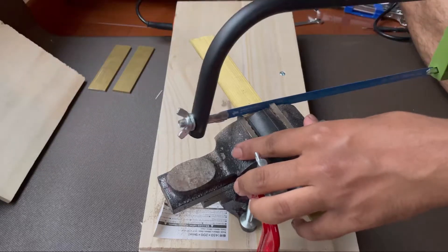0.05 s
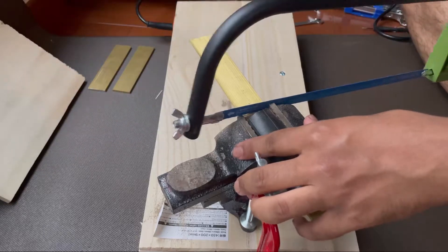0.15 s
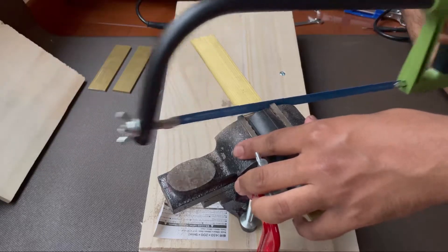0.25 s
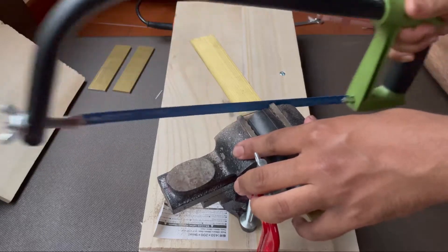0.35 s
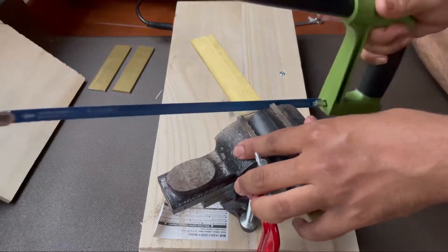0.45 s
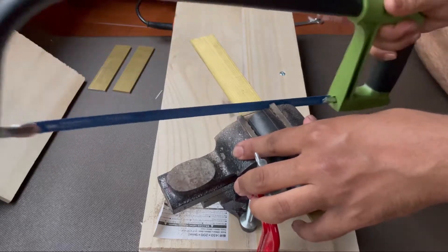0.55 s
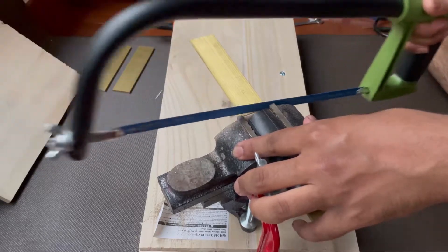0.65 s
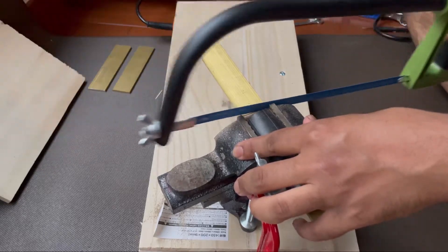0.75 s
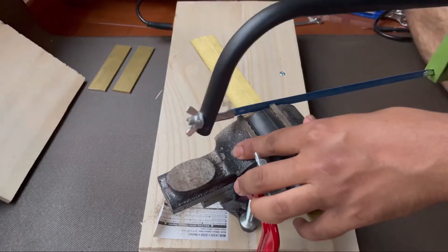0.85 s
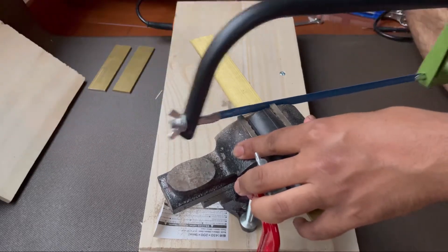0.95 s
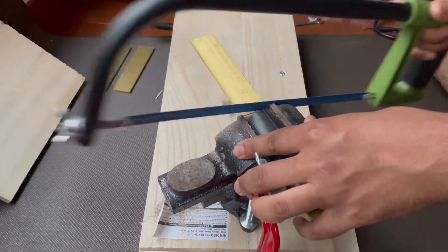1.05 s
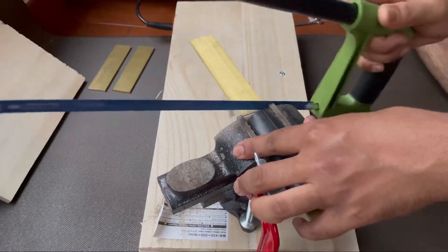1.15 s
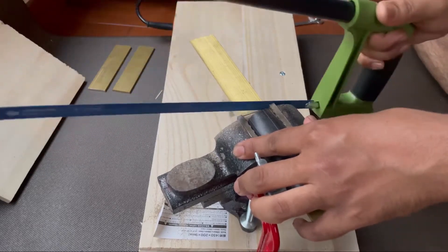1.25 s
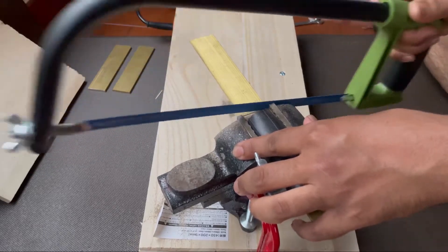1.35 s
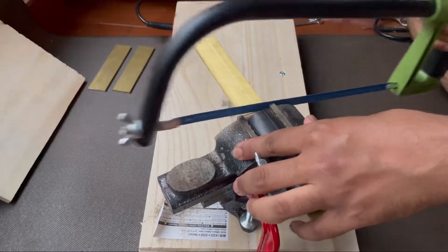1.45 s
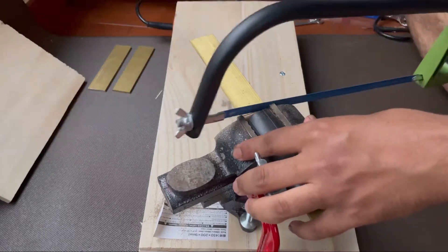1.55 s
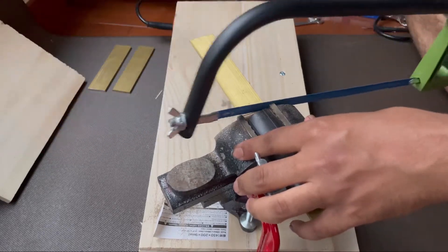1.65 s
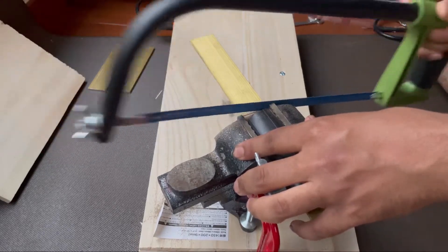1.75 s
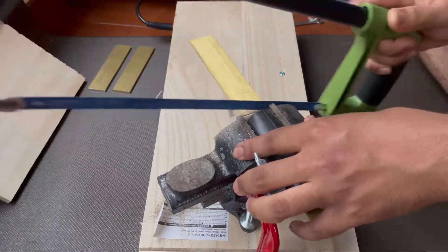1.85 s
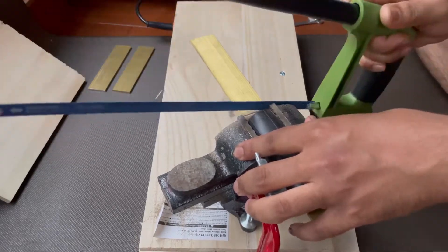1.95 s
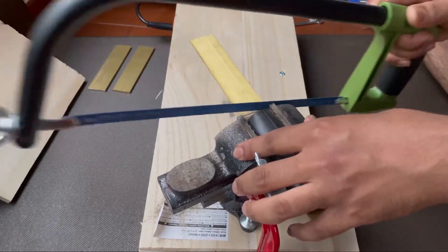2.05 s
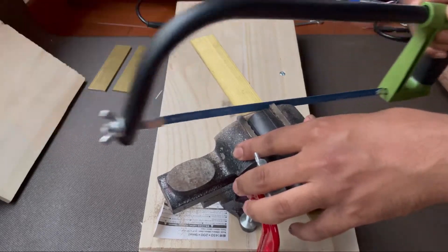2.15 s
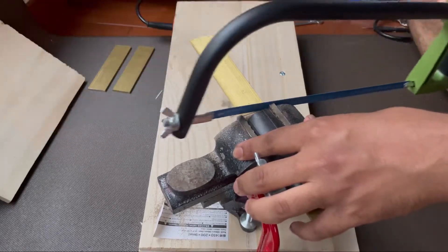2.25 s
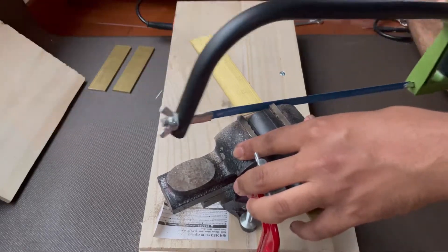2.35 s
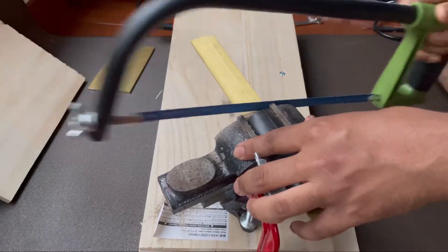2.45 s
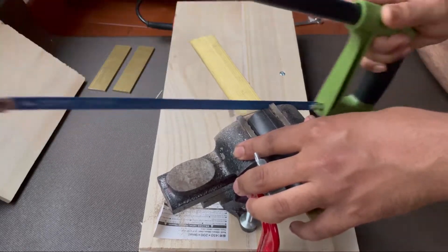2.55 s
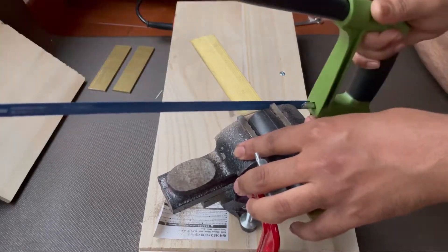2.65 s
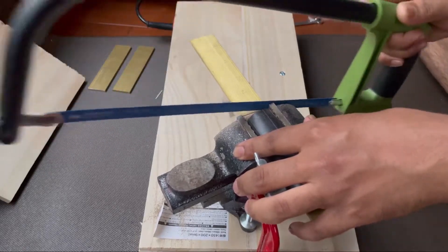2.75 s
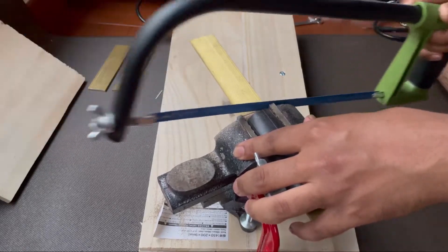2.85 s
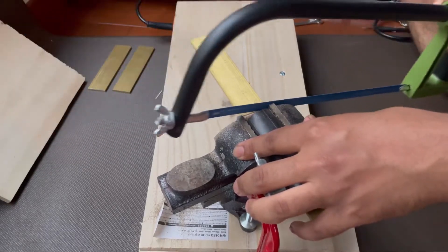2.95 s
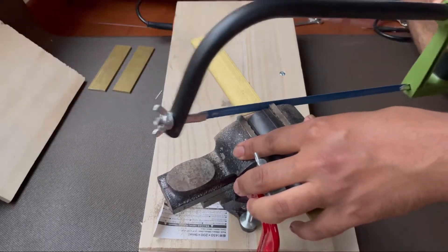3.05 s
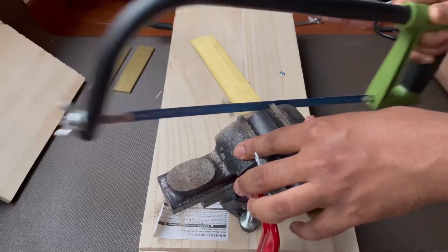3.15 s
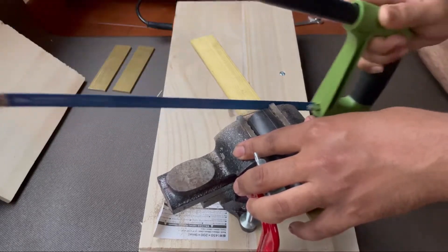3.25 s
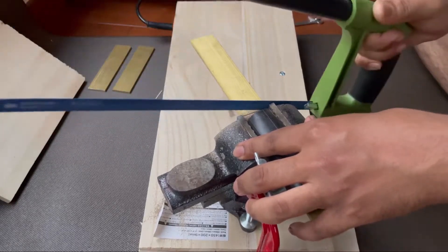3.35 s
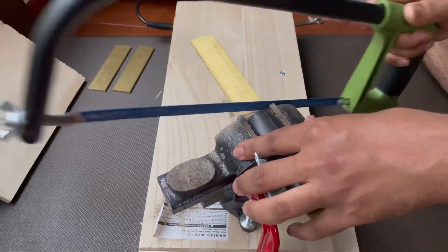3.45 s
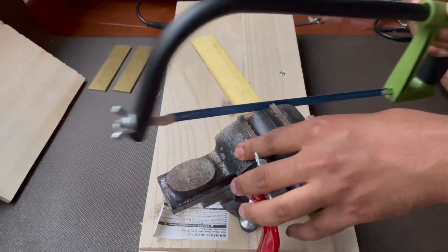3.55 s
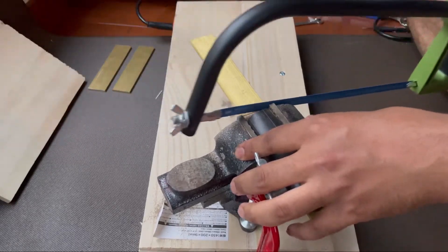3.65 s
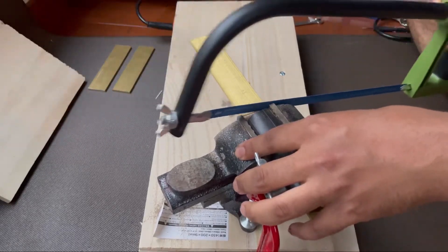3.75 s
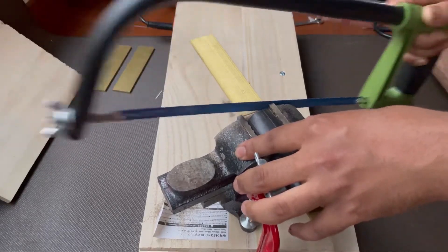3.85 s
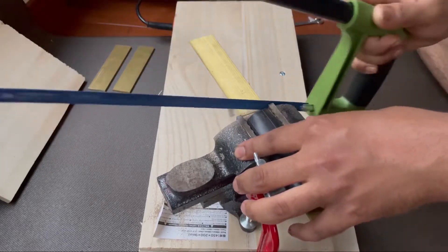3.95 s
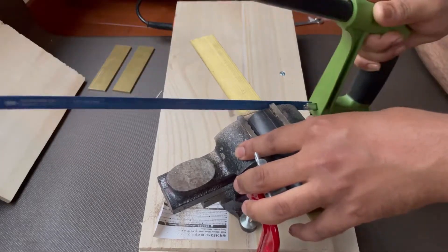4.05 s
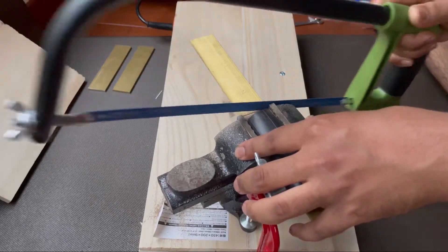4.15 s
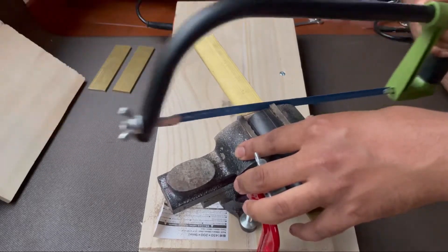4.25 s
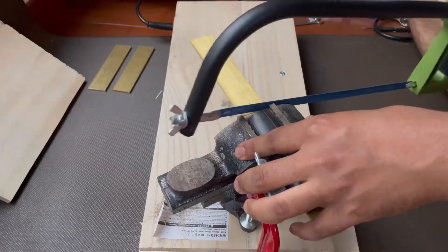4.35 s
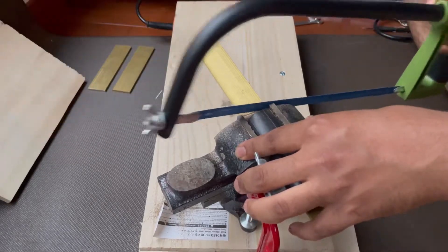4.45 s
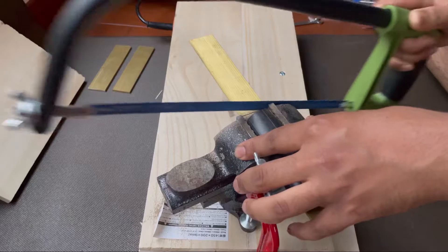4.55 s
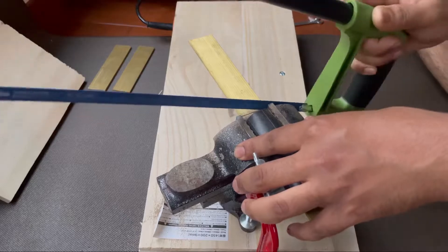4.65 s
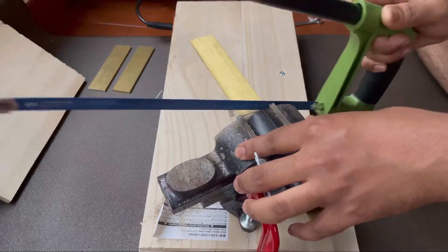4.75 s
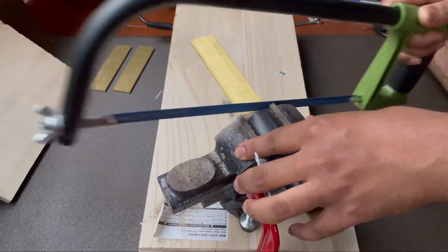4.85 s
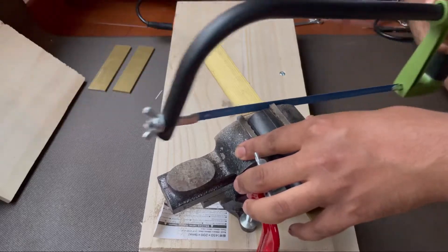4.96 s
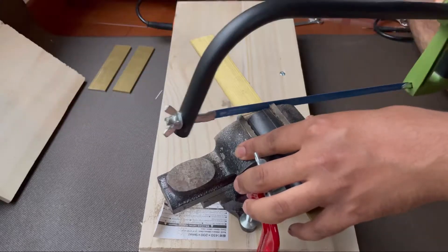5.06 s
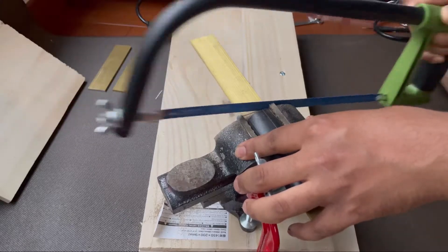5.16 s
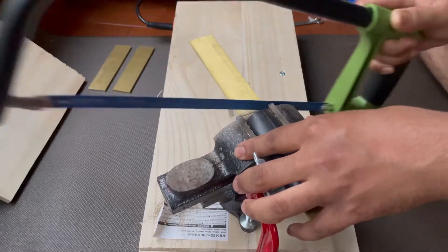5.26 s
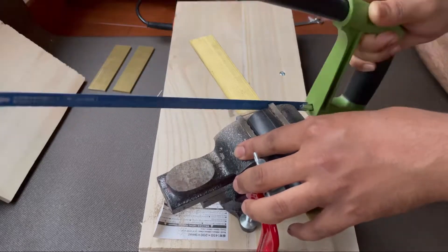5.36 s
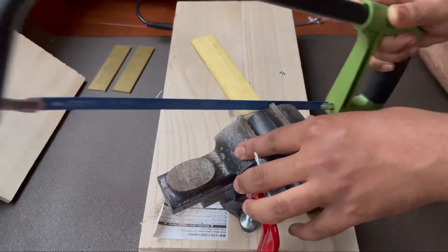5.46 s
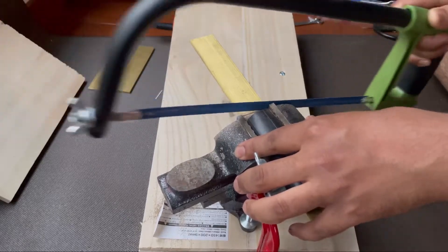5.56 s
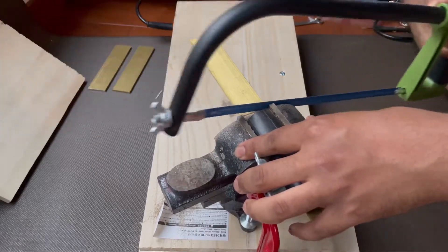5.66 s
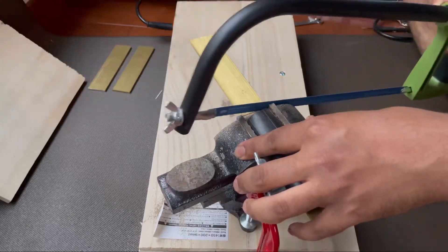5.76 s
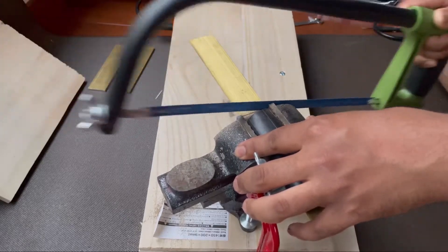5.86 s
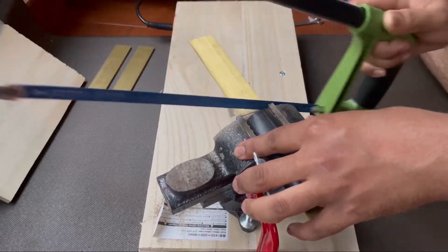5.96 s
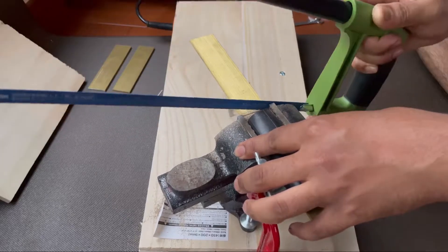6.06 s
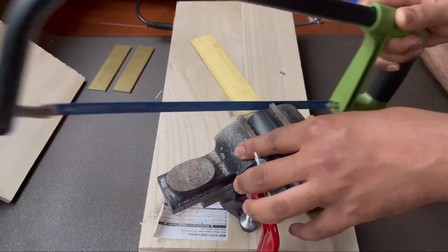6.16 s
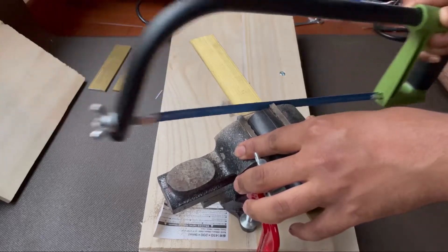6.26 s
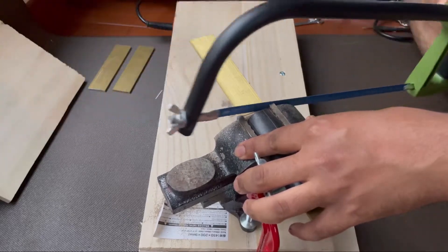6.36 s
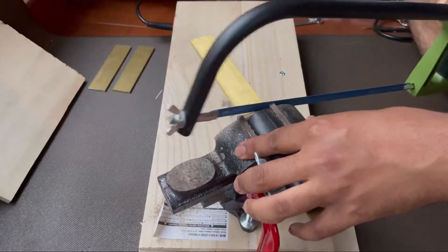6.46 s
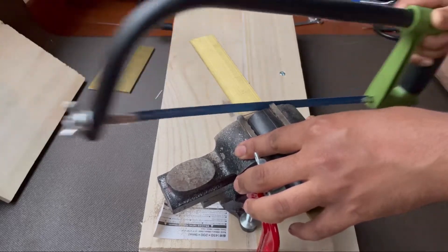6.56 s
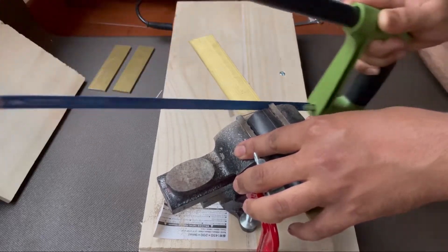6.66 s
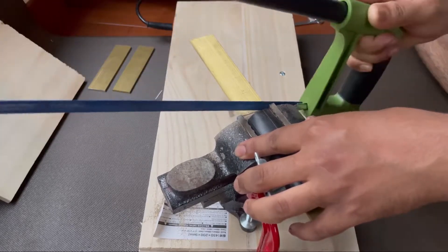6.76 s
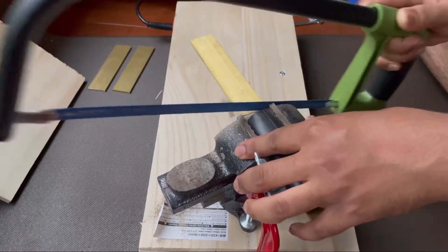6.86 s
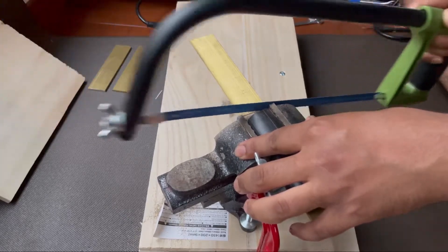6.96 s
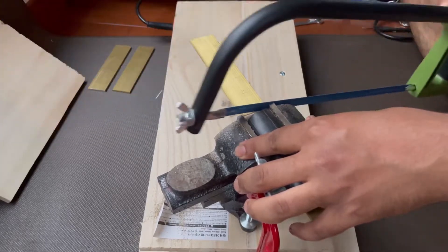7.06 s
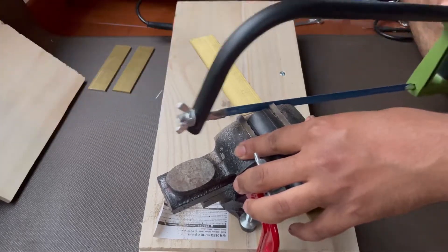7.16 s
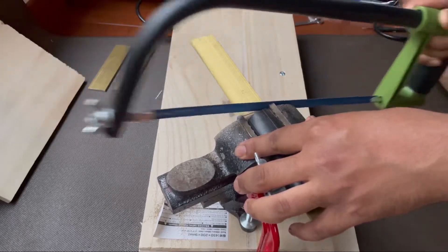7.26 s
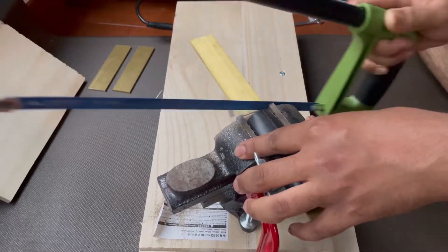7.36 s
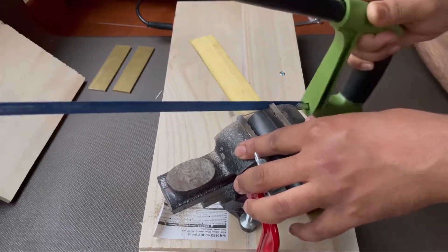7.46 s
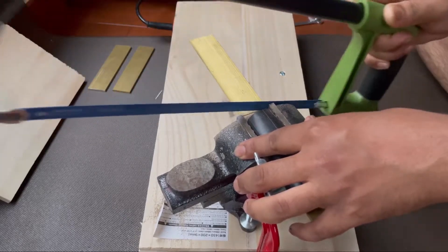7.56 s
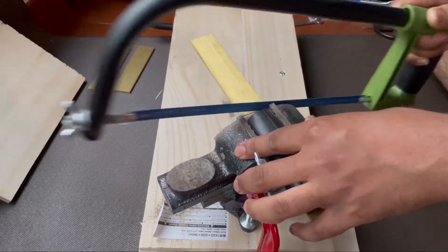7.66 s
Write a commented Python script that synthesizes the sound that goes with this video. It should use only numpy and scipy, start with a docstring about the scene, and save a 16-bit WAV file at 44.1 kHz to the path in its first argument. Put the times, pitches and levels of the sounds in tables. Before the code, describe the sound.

Close stereo pickup in a small room: a hand hacksaw cuts a brass strip held in a vise. About three strokes a second, push and pull alternating, each a gritty rasp whose buzzing pitch rises and falls with speed. Pushes are generally brighter and hissier, pulls rougher with blade chatter. Teeth sometimes catch, a dull knock comes early, and the bench rumbles softly underneath.

```python
"""A hand hacksaw cuts a brass strip held in a vise on a wooden bench, close by in a small room.
Its teeth strike at a rate that rises and falls with each stroke: clicks excite noise bursts (scrape and
chip hiss), a harmonic tooth note, and the modes of blade and vise. Push and pull differ in colour; now and
then the teeth catch. Low bench modes tremble and rock under it, one dull jolt knocks the vise, and
the room adds reflections, a diffuse tail and a soft noise floor."""
import sys
import numpy as np
from scipy import signal
from scipy.fft import rfft, irfft
from scipy.io import wavfile
from scipy.ndimage import uniform_filter1d

SR = 44100
rng = np.random.default_rng(int(sys.argv[2]) if len(sys.argv) > 2 else 0)


def waveform_to_disk(signal):
    """Save audio, clipped to [-1, 1], as 16-bit WAV at the path in sys.argv[1]."""
    frames = np.transpose(np.atleast_2d(signal))
    scaled = np.clip(frames, -1, 1) * 32767
    samples = np.round(scaled).astype(np.int16)
    wavfile.write(sys.argv[1], SR, samples)


N = 340011
TIME = np.arange(N) / SR
LAST_STROKE_END_S = 7.8
RESTING_DB = -55  # force of the blade lying in the cut
CUTOFF_HZ = 15900
ROCK_RISE_DB_PER_S, ROCK_FALL_DB_PER_S = 176.5, 94.5

# All levels are relative: later stages set the balance.
# room tone spectrum: f/Hz, level/dB per Hz
ROOM_TONE_SPECTRUM = [(25, -46), (60, -7), (150, -9), (300, -11.5), (1000, -19.5), (4000, -28),
                      (16000, -41.5)]
# reverberation time of the room: f/Hz, t60/s
ROOM_DECAY = [(200, 1), (1000, 0.528), (4000, 0.482), (15000, 0.3546)]
# modes of the bench: f/Hz, level/dB, t60/s
BENCH_MODES = [(48.2, -10.5, 0.23), (85.11, -1.5, 0.26), (95.7, -5.5, 0.2055), (136.4, -19, 0.092)]
# the bench rocks as the saw is pulled out to its tip and turned round: t/s, level/dB
BENCH_ROCKS = [(0.209, -38), (0.799, -30), (1.55, -34), (2.18, -37.5), (2.95, -41.5), (3.65, -33.5),
               (4.32, -38), (4.97, -37), (5.68, -39.5), (6.35, -35), (7.05, -32.5)]
# trembling of the bench under the drag: place (0 tip, 1 handle), push level/dB, pull level/dB
TREMBLE_BY_PLACE = [(0, -46.5, -45), (.2, -45.5, -50.5), (.5, -52, -46), (.85, -49, -42.5),
                    (1, -48.5, -47.5)]
# the saw sticks once and jolts the vise: t/s, level/dB, t60/s
VISE_JOLT = (.79, -36, 0.247)
# its dull knock: f/Hz, level/dB per Hz
KNOCK_SPECTRUM = [(60, -11.5), (120, -1), (280, -4.5), (600, -1.5), (1200, -0.5), (2500, -21), (8000, -46)]
# modes of the vise on its board: f/Hz, level/dB, t60/s
VISE_MODES = [(439.1, 0, 0.172), (464.3, -1.5, 0.093), (509.1, -5.5, 0.15), (637.8, -5.5, 0.087)]
# bending modes of the blade: f/Hz, level/dB, t60/s
BLADE_MODES = [(1029.2, -6, 0.0205), (1170.4, 0, 0.0392), (1269.7, 3, 0.03), (1386.4, 0.5, 0.0326),
               (1513, -5, 0.0072), (2285.6, -6, 0.12)]
# blade chatter: place (0 tip, 1 handle), push level/dB, pull level/dB
CHATTER_BY_PLACE = [(0, -10.5, -7.5), (.2, -18, -11), (.5, -4.5, 0), (.76, -2.5, 6.5), (.9, -8, -2),
                    (1, -16, 0.5)]
# peaks and hollows in the colour heard, with deep hollows near 5.6 and 9.3 kHz: f/Hz, width at half the # dB
# gain/Hz, gain/dB
COLOUR_BELLS = [(450, 36.7, 5), (486.6, 33, 1.5), (566, 55.5, -5), (643, 21.9, 9), (879.7, 39.7, 4.5),
                (1039, 37, 0.5), (1075.8, 90, -8.5), (1182, 33, -5), (1290, 22.6, 4), (1481, 30, 3),
                (1654, 81, -0.5), (1789, 56.5, 4), (2151.8, 50.8, 5), (2440, 130, 5), (2669.5, 76, 3.5),
                (3357, 164, 5.5), (3801, 200, 3.5), (4000, 58, -0.5), (5608, 285, -10), (6160, 224, 3),
                (6780, 450, 3), (7400, 280, 1.5), (9322, 672, -13), (10034, 560, 7)]
# radiation of the small frame, weak in the bass: f/Hz, level/dB
FRAME_RADIATION = [(150, -49.5), (370, -16.5), (450, -3.5), (700, -7.5), (1000, 0), (1400, 3), (2300, 3),
                   (4000, 1.5), (16000, -0.5)]
# broad colour of the scraping: f/Hz, level/dB per Hz
SCRAPE_SPECTRUM = [(100, -25), (250, -8.5), (380, -14), (450, -6.5), (700, -9), (1000, -8), (1400, -5.5),
                   (2300, 1), (3000, -4), (4000, 3.5), (5000, -0.5), (7000, -0.5), (8300, -9.5),
                   (16000, -23)]
# colour of the hissing chips: f/Hz, level/dB per Hz
CHIP_SPECTRUM = [(3000, -42), (7000, -18.5), (9000, 1.5), (11000, 4), (12500, 5), (14000, -0.5),
                 (16000, -9)]
# overtones of the tooth note, from the second partial up: level/dB
OVERTONE_LEVELS = [-6, -4.5, -10.5, -9.5, -6.5]
# teeth catching on the edge of the cut: t/s, level/dB, t60/s
TOOTH_CATCHES = [(.188, -31.5, 0.04), (.504, -31.5, 0.25), (.69, -21, 0.3056), (3.733, -26.5, 0.5335),
                 (4.415, -19, 0.2919), (5.778, -19.5, 0.2885), (6.472, -22.5, 0.4456), (7.668, -22, 0.26)]
# how fast the hand bears down, and lets go: push slope/(dB/s), pull slope/(dB/s)
PRESS_SLOPES = (281, 180)
RELEASE_SLOPES = (160, 169)
# exponent of the speed arch (1 a plain swing, less a flatter top):
# push speeding up, push slowing, pull speeding up, pull slowing
ARCH_EXPONENTS = (.81, .52, .74, .85)
# strokes, push and pull in turn: start t/s, time to top speed/s, top rate/(teeth/s),
# time to full pressure/s, hold/s, force level/dB, swell during the hold/dB, then offsets:
# chip hiss level/dB, tooth note level/dB, its overtones level/dB, extra blade chatter level/dB
SAW_STROKES = [(0.061, 0.164, 694.0, 0.1386, 0.1267, -30.5, 3.5, -2.5, -7, -10, 1),
               (0.446, 0.1915, 677.0, 0.088, 0.251, -34.5, 0, -3, -17.5, -10.5, 3.5),
               (0.838, 0.2357, 1071.0, 0.0886, 0.1175, -34, 5.5, -1, -4, -15, 3),
               (1.212, 0.1094, 752.0, 0.0674, 0.1416, -30.5, 6.0, -4.5, -13.0, -12, 1),
               (1.595, 0.1192, 922.0, 0.0642, 0.0854, -23.5, -2.5, -2.0, -9.5, -11, -2.0),
               (1.859, 0.2466, 678.0, 0.1215, 0.171, -33.0, 1, -5.0, -18.5, -9.0, 0.5),
               (2.271, 0.195, 984, 0.0893, 0.0783, -26.0, -0.0, -2.0, -3.5, -14.5, 1.5),
               (2.615, 0.142, 722.0, 0.0876, 0.151, -31.0, 1.0, -5, -16.5, -9.5, 0.5),
               (2.969, 0.191, 993.0, 0.09255, 0.0864, -22.5, -6.5, -1.5, -4.5, -12, 2.0),
               (3.354, 0.0725, 749.0, 0.004, 0.1707, -34.5, 8.5, -5.0, -12, -14, 1.5),
               (3.668, 0.1804, 1062.0, 0.0763, 0.1099, -24.0, -8.5, -0.5, 1, -15, 2),
               (3.955, 0.1393, 778, 0.1219, 0.1292, -30.0, 7.5, -5, -13.5, -10.5, 1),
               (4.36, 0.1518, 1019.0, 0.0583, 0.0935, -26, -2, -0.5, -2.5, -12.5, 0.5),
               (4.652, 0.1707, 714.0, 0.0992, 0.1591, -29, 0.5, -6.5, -11.5, -12, 0),
               (5.008, 0.1824, 888.0, 0.1088, 0.0622, -21.5, -6, -1.5, -0.5, -9, 2.5),
               (5.384, 0.12, 709.0, 0.0365, 0.1684, -31.5, 5, -5, -12.5, -9.5, 1.5),
               (5.703, 0.1868, 983.0, 0.0819, 0.119, -24.5, -10.5, -1, -1.5, -11.5, 1.5),
               (6.041, 0.1438, 769.0, 0.0949, 0.1297, -27.0, 3.0, -5.5, -16, -8, -2.5),
               (6.389, 0.1698, 1017.0, 0.0741, 0.1194, -25.0, -9.0, -3, -7, -6.5, 5),
               (6.731, 0.1372, 820.0, 0.1372, 0.1019, -22.5, -3.5, -5, -11, -10.5, -4),
               (7.094, 0.179, 1020.0, 0.1099, 0.0553, -20, -9.0, -2.5, -17, -8, -1.5),
               (7.441, 0.1487, 775.0, 0.09, 0.1333, -32.5, 9.0, -3.5, -13.5, -6.5, 0)]


def from_db(db):
    """Logarithmic level: decibels to amplitude gain."""
    return 10 ** (np.asarray(db) / 20)


def rms_one(x):
    """Normalisation of power: scale to rms 1."""
    return x / np.sqrt(np.mean(x ** 2) + 1e-20)


def at_hz(points, hz):
    """Interpolation of a table on a log-frequency axis."""
    known, values = np.transpose(points)
    return np.interp(np.log(np.maximum(hz, 1)), np.log(known), values)


def drift(per_s):
    """Slow random process: joined random knots, per_s of them a second, with rms 1."""
    knots = rng.standard_normal(8192)
    return rms_one(np.interp(TIME * per_s, np.arange(len(knots)), knots))


def colour(x, spectrum, bells=(), size=8192):
    """Minimum-phase filtering: a broad spectrum with bell-shaped peaks and hollows, made causal."""
    hz = np.fft.rfftfreq(size, 1 / SR)
    db = at_hz(spectrum, hz)
    for centre, width, gain in bells:
        db = db + gain * 2 ** -(2 * (hz - centre) / width) ** 2
    # folding the cepstrum onto positive times gives minimum phase
    cepstrum = irfft(np.log(from_db(db)))
    cepstrum[1:size // 2] *= 2
    cepstrum[size // 2 + 1:] = 0
    response = irfft(np.exp(rfft(cepstrum)))
    return signal.oaconvolve(x, response / np.linalg.norm(response))[:N]


def ring(force, modes):
    """Modal superposition: a force drives damped resonators in parallel, summed to rms 1."""
    out = 0
    for k, (hz, db, t60) in enumerate(modes):
        radius = from_db(-60 / (t60 * SR))
        angle = 2 * np.pi * hz / SR
        poles = [1, -2 * radius * np.cos(angle), radius * radius]
        mode = rms_one(signal.lfilter([1, 0, -1], poles, force))
        out = out + (-1) ** k * from_db(db) * mode  # neighbours in opposite sign
    return rms_one(out)


def swell(s, db, rise_db_per_s, fall_db_per_s, hold_s=0, swell_db=0):
    """Exponential envelope: attack up to time s, a hold that may swell or sag, release."""
    age = TIME - s
    held = np.clip(age / max(hold_s, 1e-3), 0, 1)
    rise_db = rise_db_per_s * np.maximum(-age, 0)
    fall_db = fall_db_per_s * np.maximum(age - hold_s, 0)
    return from_db(db + swell_db * held - rise_db - fall_db)


def motion():
    """Kinematics of the swing: teeth per second, stroke number, place in the cut (0 tip, 1 handle)."""
    start, speed_up_s, top = np.transpose(SAW_STROKES)[:3]
    marks = np.append(np.column_stack([start, start + speed_up_s]).ravel(), LAST_STROKE_END_S)
    half_strokes = np.interp(TIME, marks, np.arange(len(marks)))
    stroke = np.minimum(half_strokes // 2, len(top) - 1).astype(int)
    swing = half_strokes * np.pi / 2
    exponent = np.array(ARCH_EXPONENTS)[half_strokes.astype(int) % len(ARCH_EXPONENTS)]
    rate = top[stroke] * np.abs(np.sin(swing)) ** exponent  # stops at each turn
    return rate, stroke, (1 - np.cos(swing)) / 2


def along_blade(table, stroke, place):
    """Position-dependent excitation: level in dB by place in the cut and direction (odd strokes pull)."""
    places, push, pull = np.transpose(table)
    return np.where(stroke % 2, np.interp(place, places, pull), np.interp(place, places, push))


def room_tone(level_db=-58):
    """Diffuse noise floor: independent coloured noise in each channel."""
    tone = np.array([colour(rng.standard_normal(N), ROOM_TONE_SPECTRUM) for _ in range(2)])
    return from_db(level_db) * tone


def rocking():
    """Addition of powers: a tremble under every stroke joins a rock at each listed turn."""
    _, stroke, place = motion()
    power = from_db(along_blade(TREMBLE_BY_PLACE, stroke, place)) ** 2
    for s, db in BENCH_ROCKS:
        power = power + swell(s, db, ROCK_RISE_DB_PER_S, ROCK_FALL_DB_PER_S) ** 2
    return np.sqrt(uniform_filter1d(power, size=800))


def bench():
    """Forced vibration: the uneven pull on the vise, as low noise, shakes the modes of the bench."""
    band = signal.butter(2, [42, 220], "band", fs=SR, output="sos")
    sway = ring(signal.sosfilt(band, rng.standard_normal(N)), BENCH_MODES)
    # level out the chance swells, so that the rocking sets the strength
    steady = sway / np.sqrt(uniform_filter1d(sway ** 2, size=4000) + 0.068)
    return rocking() * steady


def jolt():
    """Impact: a rough, dull knock of the vise on its board, as decaying coloured noise."""
    s, db, t60 = VISE_JOLT
    knock = rms_one(colour(rng.standard_normal(N), KNOCK_SPECTRUM))
    return swell(s, db, rise_db_per_s=2000, fall_db_per_s=60 / t60) * knock


def vise_moan(passed, force, stroke, place, moan_db=-54, push_db=-6, tip_length=0.173, spread_rad=-1.375):
    """Swept resonance: near the tip the tooth rate slides through the vise modes, most on the pull."""
    shake = np.sqrt(force) * np.exp(-place / tip_length) * from_db(np.where(stroke % 2, 0, push_db))
    phase = np.array([[0], [spread_rad]])  # left, right
    return from_db(moan_db) * ring(shake * np.sin(2 * np.pi * passed + phase), VISE_MODES)


def vise_groan(crackle, force, rate, level_db=-21.5, fast_db=-9):
    """Inertia: the heavy vise answers best to slow teeth, so it groans near the turns."""
    drag = crackle * np.sqrt(force) * from_db(fast_db * rate / rate.max())
    return from_db(level_db) * np.sqrt(np.mean(force ** 2)) * ring(drag, VISE_MODES)


def blade_chatter(crackle, hand, stroke, place, level_db=-3.5):
    """Bending vibration: the crackle drives the blade modes, strongest three quarters of the way up."""
    blade_db = along_blade(CHATTER_BY_PLACE, stroke, place) + np.array(SAW_STROKES)[stroke, -1]
    return hand * from_db(level_db + blade_db) * ring(crackle.mean(axis=0), BLADE_MODES)


def tooth_note(passed, stroke, place, spread_rad=0.933):
    """Periodic excitation: evenly spaced teeth sing partials of their rate, which arch with the speed."""
    worn_db, entry_db, pull_db, overtone_level_db = -14, -10, 5, .5
    flutter_db, patchy_db = 4.5, 2.5
    note_db, overtones_db = np.array(SAW_STROKES)[stroke, 8:10].T
    to_tip, to_handle = np.maximum(1 - 2 * place, 0), np.maximum(2 * place - 1, 0)
    # entering the push the teeth only nick the edge, thin and bright; on the pull they ride over it and groan
    note_db = note_db + np.where(stroke % 2, pull_db, entry_db) * to_tip
    partials = [(1, note_db)]  # fundamental, at the tooth rate
    partials += [(k + 2, overtones_db + overtone_level_db + db) for k, db in enumerate(OVERTONE_LEVELS)]
    phase = np.array([[0], [spread_rad]])  # the flat blade reaches the two microphones out of step
    note = 0
    for k, db in partials:
        waver_db = flutter_db * drift(per_s=110) + patchy_db * drift(per_s=35)
        note = note + from_db(db) * rms_one(np.sin(2 * np.pi * k * passed + phase) * from_db(waver_db))
    note = note * from_db(worn_db * np.sqrt(to_handle))  # the half near the handle is worn
    return np.array([colour(x, FRAME_RADIATION, COLOUR_BELLS) for x in note])


def teeth(passed, rate, uneven_db):
    """Impulse train: one click of uneven height for each passing tooth, weaker when they crowd."""
    strikes = np.diff(np.floor(passed), prepend=0)
    return strikes * from_db(uneven_db * rng.standard_normal(N)) / np.sqrt(rate + 150)


def tearing(clicks, length_s, clump_db, spread_db, grab_db=0.7122):
    """Fracture noise: behind each tooth a chip tears off in a short crackle, partly unlike left and right."""
    burst = signal.lfilter([1], [1, -np.exp(-1 / (length_s * SR))], clicks)
    noise = rng.standard_normal(N) + from_db(spread_db) * rng.standard_normal((2, N))
    grip_db = clump_db * drift(per_s=260) + grab_db * drift(per_s=55)  # single teeth, and runs that grab
    return rms_one(burst * noise * from_db(grip_db))


def share_load(x, rate, span_teeth=0.776):
    """Load sharing among teeth: less a moving mean, changes slower than the tooth rate even out."""
    half = span_teeth * SR / np.maximum(rate, 300) / 2
    n = np.arange(N)
    means = []
    for total in np.cumsum(x, axis=1):
        upper = np.interp(n + .5 + half, n + 1, total)
        lower = np.interp(n + .5 - half, n + 1, total)
        means.append((upper - lower) / (2 * half))
    return x - means


def scraping(crackle, rate, level_db=-0.5):
    """Filtered friction noise: the shared load of the teeth takes on the colour of the sawing."""
    load = share_load(crackle, rate)
    return from_db(level_db) * rms_one(np.array([colour(x, SCRAPE_SPECTRUM, COLOUR_BELLS) for x in load]))


def chip_hiss(crackle, stroke, place, level_db=-1.5, tip_dull_db=-6, tip_length=0.0708):
    """High-frequency fracture noise: each stroke has its own hiss, and the very tip cuts dully."""
    bite_db = np.array(SAW_STROKES)[stroke, 7] + tip_dull_db * np.exp(-place / tip_length)
    hiss = rms_one(np.array([colour(x, CHIP_SPECTRUM, COLOUR_BELLS) for x in crackle]))
    return from_db(level_db + bite_db) * hiss


def catches():
    """Transient force of the snags: a jump that dies away exponentially."""
    force = np.zeros(N)
    for s, db, t60 in TOOTH_CATCHES:
        age = np.maximum(TIME - s, 0)
        force += from_db(db - 60 * age / t60) * np.minimum(age / 0.00068, 1)
    return force


def pressure():
    """Contact force of the hand: it bears down, holds and lets go once in each stroke."""
    power = from_db(RESTING_DB) ** 2
    for k, (start, _, _, press_s, hold_s, db, swell_db, *_) in enumerate(SAW_STROKES):
        rise, fall = PRESS_SLOPES[k % 2], RELEASE_SLOPES[k % 2]
        power = power + swell(start + press_s, db, rise, fall, hold_s, swell_db) ** 2
    return np.sqrt(power)


def saw(catch_db=-1):
    """Source and resonator: tooth note and tearing chips sound out, and shake blade and vise."""
    rate, stroke, place = motion()
    hand = pressure()
    force = np.hypot(hand, from_db(catch_db) * catches())
    judder = 1 + .03 * drift(per_s=400)
    passed = np.cumsum(rate * judder + 5) / SR  # count of teeth gone by, creeping on at the turns
    crackle = tearing(teeth(passed, rate, uneven_db=2.0), length_s=0.00118, clump_db=1.5, spread_db=0.5)
    cutting = scraping(crackle, rate) + chip_hiss(crackle, stroke, place) + tooth_note(passed, stroke, place)
    chatter = blade_chatter(crackle, hand, stroke, place)
    vise = vise_groan(crackle, force, rate) + vise_moan(passed, force, stroke, place)
    return force * cutting + chatter + vise


def room(x, near_db=-7, near_t60=0.062, far_db=-6, far_delay_s=.006, lag_s=.00007):
    """Reverberation: direct sound, quick reflections from bench and hands, and a diffuse tail."""
    age = TIME[:SR * 3 // 4]
    hz = np.fft.rfftfreq(len(age), 1 / SR)
    white = rfft(rng.standard_normal((2, len(age))))  # different at each microphone
    tail = 0
    for share, (_, t60) in zip(np.eye(len(ROOM_DECAY)), ROOM_DECAY):
        # overlapping bands, each with its own decay
        band = at_hz(np.column_stack([np.array(ROOM_DECAY)[:, 0], share]), hz)
        tail = tail + irfft(white * band, len(age)) * from_db(-60 * age / t60)
    near = rng.standard_normal((2, len(age))) * from_db(-60 * age / near_t60) * (age > .0007)
    far = tail * (age > far_delay_s)
    paths = 0
    for db, path in ((near_db, near), (far_db, far)):
        paths = paths + from_db(db) * path / np.linalg.norm(path, axis=1, keepdims=True)
    paths[0, 0] += 1
    paths[1, round(lag_s * SR)] += 1  # the saw is nearer to the left microphone
    paths /= np.linalg.norm(paths, axis=1, keepdims=True)
    return signal.fftconvolve(x, paths, axes=1)[:, :N]


def scene(left_db=3.5, right_db=2.5):
    """Superposition: room tone, bench rumble, and saw and jolt in the room."""
    return room_tone() + bench() + from_db([[left_db], [right_db]]) * room(saw() + jolt())


def record(dry):
    """Band limiting: the stereo image narrows above 12 kHz, and the very top is cut."""
    mid, side = (dry[0] + dry[1]) / 2, (dry[0] - dry[1]) / 2
    side = signal.sosfiltfilt(signal.butter(10, 12000, fs=SR, output="sos"), side)
    top_cut = signal.ellip(12, .1, 80, CUTOFF_HZ, fs=SR, output="sos")
    return signal.sosfilt(top_cut, np.array([mid + side, mid - side]))


dry = scene()
out = record(dry)
waveform_to_disk(out)
```